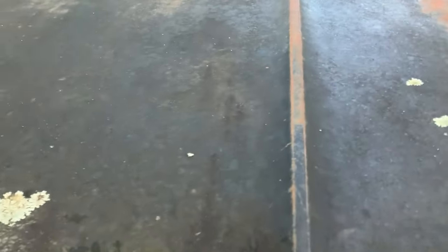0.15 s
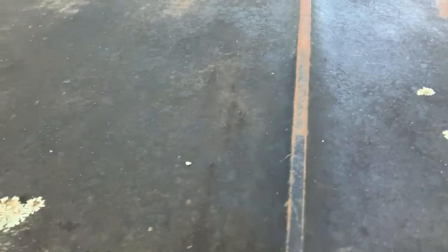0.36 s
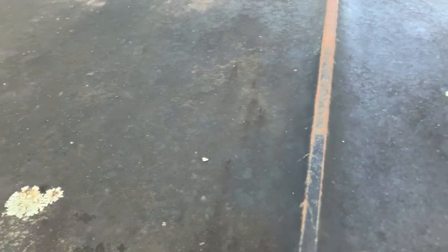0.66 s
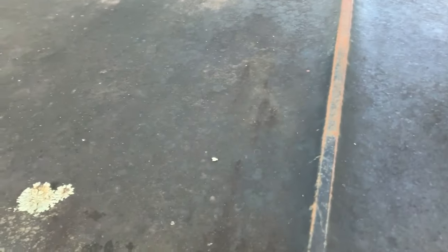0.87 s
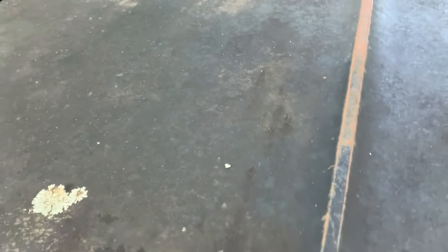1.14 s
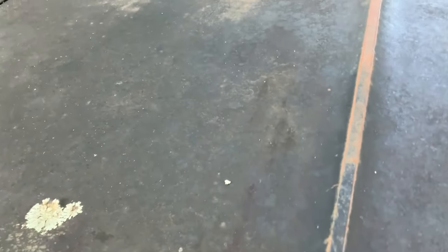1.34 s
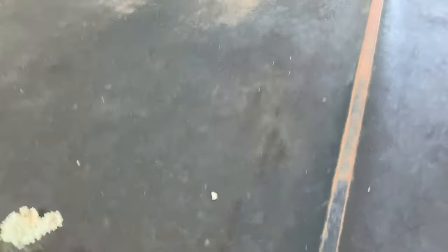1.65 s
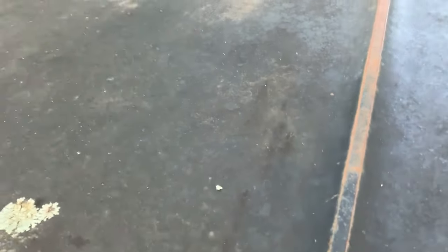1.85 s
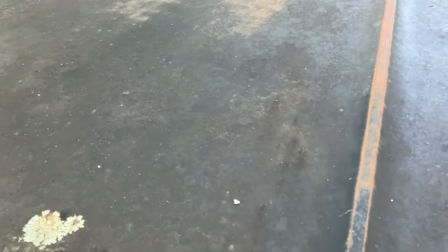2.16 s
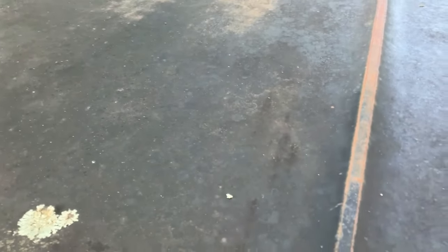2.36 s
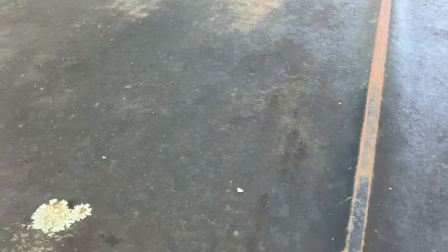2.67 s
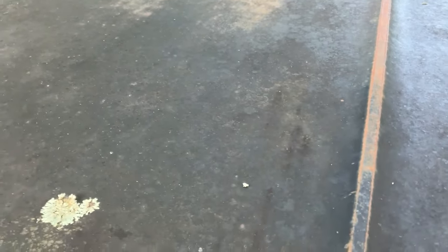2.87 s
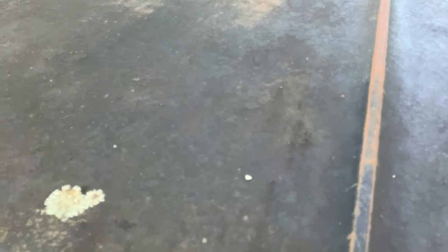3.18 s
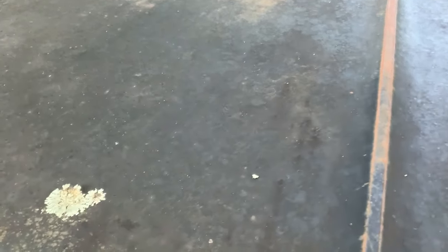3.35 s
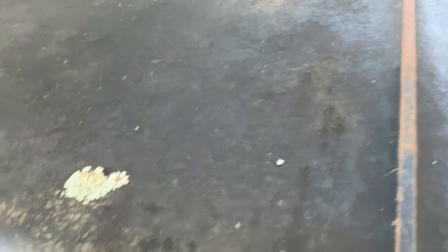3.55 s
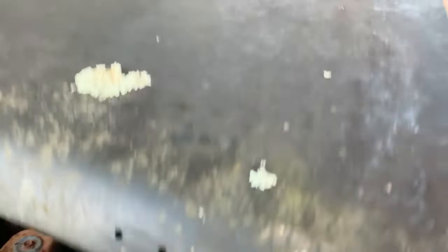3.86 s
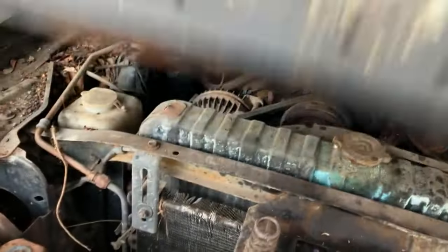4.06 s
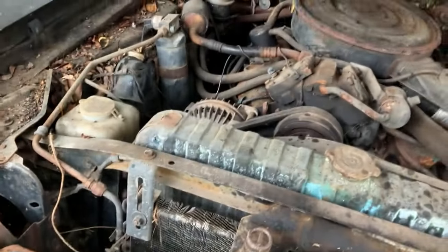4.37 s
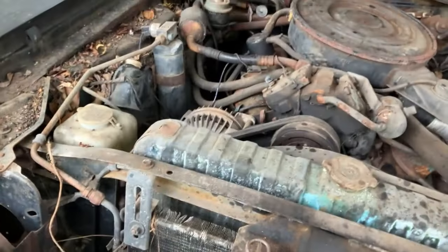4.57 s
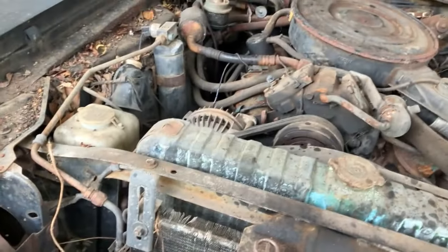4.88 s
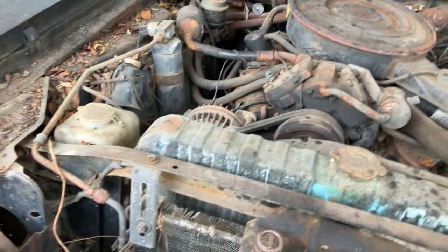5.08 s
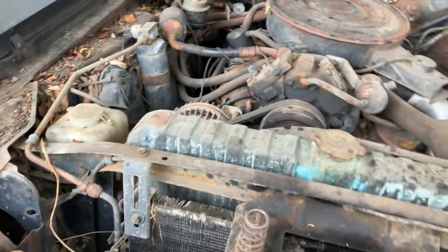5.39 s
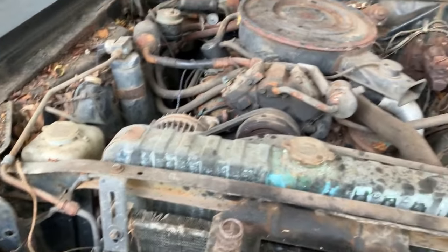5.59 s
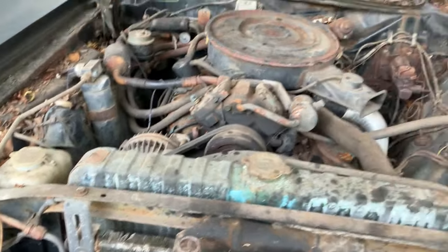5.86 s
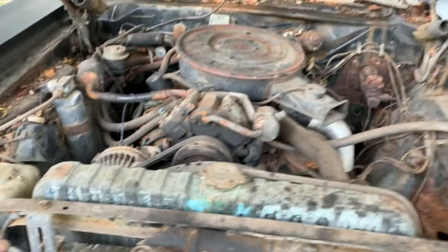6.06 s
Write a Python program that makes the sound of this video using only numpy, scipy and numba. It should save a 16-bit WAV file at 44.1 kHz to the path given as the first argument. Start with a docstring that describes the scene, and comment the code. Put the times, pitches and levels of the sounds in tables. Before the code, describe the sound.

Quiet outdoor air with very faint far traffic and thin insect hiss, heard close to a rusty steel hood. From 0 to 0.6 s hands scuff and push the sheet, giving soft low knocks and rumble; a high bird whistle glides down at 0.5 s. A firmer knock lands at 1.0 s, and a lower bird call follows at 1.3 s. At 1.5 s a booming clunk leads into the heavy, hollow unlatching blow at 1.64 s, with rough scraping until about 2.1 s. Small knocks, scuffs and a faint squeak continue from 2.4 to 3.3 s, then a near lull. From 3.6 s the hood swings up with growing rumble and scrape, a light click at 4.2 s, and a bright ringing spring clang at 4.75 s. Swaying and rubbing follow, a hard deep thud hits at 5.4 s, and dry leaves crackle from 5.8 s to the end.

```python
"""A rusty steel car hood outdoors, under still air, far traffic and insects (bands of filtered noise).
Hands scuff and push it (swelling noise), blows ring its dense modes, the hinge squeaks (narrow noise) and
far birds call (gliding whistles). Heavy clunks unlatch it near 1.6 s; from 3.6 s it swings up until its
hinge spring clangs near 4.75 s. A hard blow follows near 5.4 s, then dry leaves crackle (short ringing
bursts). A phone held just above the hood listens."""
import sys
import numpy as np
from scipy import signal
from scipy.fft import rfft, irfft, next_fast_len
from scipy.io import wavfile
from scipy.ndimage import uniform_filter1d
from numba import njit

SR = 44100
rng = np.random.default_rng(int(sys.argv[2]) if len(sys.argv) > 2 else 0)


def generate_wav(signal):
    """Clip the signal to [-1, 1] and save it as 16-bit WAV at the path in sys.argv[1]."""
    frames = np.transpose(np.atleast_2d(signal))
    scaled = np.clip(frames, -1, 1) * 32767
    pcm = np.round(scaled).astype(np.int16)
    wavfile.write(sys.argv[1], SR, pcm)


N = 274504  # length in samples


def undb(db):
    """Decibels to amplitude."""
    return 10 ** (np.asarray(db) / 20)


def along(table, hz):
    """Read a (freq_hz, value) table on a log-frequency axis."""
    table_hz, value = np.transpose(table)
    return np.interp(np.log(np.maximum(hz, 1)), np.log(table_hz), value)


def bell(hz, centre_hz, width_hz):
    """Gaussian band; width_hz is its standard deviation."""
    return np.exp(-.5 * ((hz - centre_hz) / width_hz) ** 2)


def noise(gain_of_hz, alike_hz=510.0):
    """Coloured stereo noise of rms 1; below alike_hz the two sides grow alike."""
    size = next_fast_len(N)
    hz = np.arange(size // 2 + 1) * SR / size
    mid, side = rng.standard_normal((2, len(hz), 2)) @ np.array([1, 1j])
    side = side * np.clip(hz / alike_hz, .1, 1)
    spectrum = np.array([mid + side, mid - side]) * gain_of_hz(hz)
    x = irfft(spectrum, size)[:, :N]
    return x / np.sqrt(np.mean(x ** 2))


@njit
def add_modes(out, start, left, right, pole, rise, head, head_fade):
    """Add decaying modes from one moment on; each builds up smoothly and its onset level can differ."""
    for m in range(len(pole)):
        ringing, yet_to_rise, extra = 1 + 0j, 1., head
        for i in range(start, out.shape[1]):
            # stop once the mode is inaudible
            if (i & 31) == 0 and abs(ringing * left[m]) < 1e-5:
                break
            wave = ringing * (1 - yet_to_rise) ** 2 * (1 + extra)
            out[0, i] += (wave * left[m]).imag
            out[1, i] += (wave * right[m]).imag
            ringing *= pole[m]
            yet_to_rise *= rise[m]
            extra *= head_fade


# Colour of still air and far traffic: freq_hz, density_db (per Hz, relative)
AIR_COLOUR = [(15, -46.5), (25, 20), (236, 6), (840, 1.5), (936, -1), (1700, -12.5), (2840, -14),
              (3250, -12.5), (4740, -9), (8590, -6), (9570, -23), (14800, -9), (16000, -26.5)]
AIR_DB = -66.5  # rms level
# Steady insect bands: centre_hz, width_hz, level_db
INSECT_BANDS = [(4684, 420, -70), (6300, 110, -75)]


def outdoors():
    """Still air and far traffic as broad noise, under narrow noise bands of insects."""
    air = undb(AIR_DB) * noise(lambda f: undb(along(AIR_COLOUR, f)), alike_hz=800.)
    insects = sum(undb(db) * noise(lambda f: bell(f, centre_hz, width_hz))
                  for centre_hz, width_hz, db in INSECT_BANDS)
    return air + insects


def grain(hold_s, spread_db):
    """Uneven grip: random levels held briefly, a few much louder; rms 1."""
    hold = max(int(hold_s * SR), 1)
    levels = undb(spread_db * rng.exponential(size=N // 20))
    gain = uniform_filter1d(np.repeat(levels, hold)[:N], hold)
    return gain / np.sqrt(np.mean(gain ** 2))


def lumps(hz, width_hz, spread_db):
    """Random resonances of the parts that rub, one level every width_hz."""
    levels_db = spread_db * rng.standard_normal(1000)
    return undb(np.interp(hz / width_hz, np.arange(1000), levels_db))


FADE_DB = 20  # lost over one length after the peak

# The hood swings up on its stiff hinges: time_s, rumble_db, scrape_db, rustle_db (before the rustle lift)
HOOD_SWING = [(3.6, -82.5, -87.5, -100), (3.8, -65.5, -70, -90), (3.97, -55, -66, -83),
              (4.08, -55.5, -57.5, -71.5), (4.28, -56.5, -55, -67.5), (4.47, -56, -53.5, -66),
              (4.64, -50, -53, -67.5), (4.73, -56, -59.5, -64), (4.85, -89.5, -89.5, -100)]


def swells(moves, swing_column, rise, rounding):
    """Gain along time: moves rise, peak and fade by one rule; the swing of the hood adds in power."""
    t, swing = np.arange(N) / SR, np.array(HOOD_SWING)
    swing_db = np.interp(t, swing[:, 0], swing[:, swing_column], left=-200, right=-200)
    power = undb(swing_db) ** 2
    for peak_s, length_s, db in moves:
        near = slice(max(int((peak_s - 3 * length_s) * SR), 0), int((peak_s + 4 * length_s) * SR))
        u = (t[near] - peak_s) / max(length_s, .01)
        distance = np.where(u < 0, -u / rise, u)
        power[near] += undb(db - FADE_DB * distance ** rounding) ** 2
    return np.sqrt(power)


# Cloth and rust scuff over the sheet: peak_s, length_s, scrape_db, rustle_db (before the rustle lift)
SCUFF_MOVES = [(0.021, 0.056, -56, -65), (0.114, 0.19, -56.5, -62.5), (0.302, .1, -57.5, -64.5),
               (0.456, 0.073, -61, -64.5), (0.523, 0.075, -55, -63.5), (0.903, 0.073, -70.5, -69.5),
               (0.972, .15, -64, -68), (1.094, 0.036, -70, -75), (1.214, 0.047, -70, -75),
               (1.323, 0.12, -63.5, -73.5), (1.567, 0.14, -54, -67), (1.69, .12, -37.5, -51),
               (1.804, .1, -44, -55), (1.964, 0.11, -40.5, -52), (2.107, 0.072, -55.5, -63.5),
               (2.178, 0.055, -60, -61), (2.405, 0.037, -55.5, -69), (2.452, .06, -53, -69.5),
               (2.62, 0.054, -53, -65), (2.684, 0.19, -50, -62), (2.988, 0.17, -58.5, -62.5),
               (3.196, 0.089, -59, -69), (3.268, 0.11, -57.5, -70), (3.41, 0.22, -68, -73),
               (3.568, 0.54, -71, -70.5), (3.719, 0.024, -54, -75), (3.778, .1, -62.5, -75),
               (4.862, 0.31, -44, -65.5), (5.005, 0.11, -53, -58.5), (5.12, .2, -61.5, -67),
               (5.248, 0.13, -51, -61.5), (5.402, 0.19, -51, -61), (5.48, 0.071, -58.5, -78),
               (5.64, 0.14, -65, -73), (5.83, 0.031, -60, -56.5), (5.953, 0.19, -56, -55),
               (6.125, 0.44, -65, -67.5)]
SCUFF_RISE, SCUFF_ROUND = 0.62, 1.27  # rise as share of the length; 1 = pointed top, 2 = round top
# Colour of the scrape: freq_hz, density_db (per Hz, relative)
SCRAPE_SPECTRUM = [(240, -39.5), (400, 0.5), (689, -5.5), (754, -5.5), (1170, -4), (1590, -11.5),
                   (1810, -9), (2090, -8.5), (6000, -21.5), (7800, -43), (13200, -120)]


def scrape():
    """Rough rubbing: noise through random resonances, with the grain of an uneven grip."""
    peak_s, length_s, scrape_db, _ = np.transpose(SCUFF_MOVES)
    scraping = swells(zip(peak_s, length_s, scrape_db), 2, SCUFF_RISE, SCUFF_ROUND)
    rubbing = noise(lambda f: undb(along(SCRAPE_SPECTRUM, f)) * lumps(f, 70., 3.0))
    return rubbing * grain(0.016, 1.2) * scraping


# Colour of the rustle: freq_hz, density_db (per Hz, relative)
RUSTLE_SPECTRUM = [(2500, 0), (4000, -1.5), (7000, 6.5), (11000, 9.5), (16000, 4)]
RUSTLE_LIFT_DB = 7.5  # added to every rustle level


def rustle():
    """Fine treble of the same scuffs: noise broken into very short uneven grains."""
    peak_s, length_s, _, rustle_db = np.transpose(SCUFF_MOVES)
    rustling = swells(zip(peak_s, length_s, rustle_db), 3, SCUFF_RISE, SCUFF_ROUND)
    # 40 dB less below 2500 Hz
    treble = noise(lambda f: undb(along(RUSTLE_SPECTRUM, f) - 40 * (f < 2500)))
    return undb(RUSTLE_LIFT_DB) * treble * grain(0.00049, 2.65) * rustling


# Strongest modes of the shut hood: freq_hz, over_dense_db, t60_s (before a blow's ring factor)
SHUT_HOOD_MODES = [(52, -13, 0.76), (70.4, 1, 0.58), (97.7, 13.5, 0.89), (193.4, 4, 1), (231, 5, 0.8),
                   (266, 11, 0.63), (299.1, -1.5, 0.67), (367.6, 0.5, 0.78), (462, 8.5, 0.88),
                   (520, 4, 0.83), (565, 5, 1), (682, -1.5, 0.71), (826, 0.5, 0.42), (974, 15, 0.33),
                   (1122, 5.5, 1), (1584, -2.5, .3), (1824, 11.5, 0.29), (2660, 13, 0.29), (2830, 4, 0.22),
                   (5100, 14.5, 0.054)]


def sheet_peaks(hz, width_hz, peak_db):
    """Whatever pushes the sheet is heard through its strongest modes."""
    return 1 + undb(peak_db) * sum(bell(hz, mode_hz, width_hz) for mode_hz, _, _ in SHUT_HOOD_MODES)


# Hands push the sheet, or it sways after a blow: peak_s, length_s, rumble_db
PUSH_MOVES = [(0.11, 0.2, -34.5), (0.2, 0.26, -38.5), (0.304, .25, -38), (0.45, 0.41, -41),
              (0.558, 0.14, -41.5), (1.03, 0.26, -40), (1.9, 0.67, -29.5), (2.47, 0.072, -40.5),
              (2.61, .5, -48), (2.824, 0.16, -51), (2.972, 0.14, -58.5), (3.27, 0.18, -39.5),
              (3.5, 0.34, -55), (4.9, 0.64, -31), (5.29, 0.55, -37.5), (5.44, 0.27, -24.5),
              (5.91, 0.46, -54)]
PUSH_RISE, PUSH_ROUND = 0.25, 0.79  # rise as share of the length; 1 = pointed top, 2 = round top
# Colour of the rumble: freq_hz, density_db (per Hz, relative)
RUMBLE_SPECTRUM = [(18, -57), (30, -4), (86, 1.5), (131, 4.5), (204, 0), (412, -5.5), (590, -53.5),
                   (846, -24.5), (1500, -77), (1950, -36.5), (3300, -120)]


def rumble():
    """Low noise of the pushed or swaying sheet, coloured by its modes and an uneven grip."""
    pushing = swells(PUSH_MOVES, 1, PUSH_RISE, PUSH_ROUND)
    sheet = noise(lambda f: undb(along(RUMBLE_SPECTRUM, f)) * sheet_peaks(f, 5.0, 0.67), alike_hz=1800.)
    return sheet * pushing * grain(.012, 1.6)


# Centres of the boom, body, knock, clank and crack bands: centre_hz
BLOW_BAND_HZ = (85, 280, 850, 2700, 9000)
# Ring of the sheet's dense modes: freq_hz, t60_s (before random spread and a blow's ring factor)
DENSE_T60 = [(40, 0.73), (110, 0.49), (280, 0.98), (740, 0.99), (1900, 0.48), (4000, 0.27), (8000, 0.23),
             (16000, .12)]
# The two microphone ports hear the wide sheet at different phases: freq_hz, spread_rad
PORT_SPREAD = [(100, .08), (250, .22), (500, .7), (1000, 1.6), (4000, 1.5), (12000, 1.6)]
SPLIT = 0.84  # dents split each strong mode in three that beat: Hz per root of the frequency
PING_HZ = 900  # strong modes above this are pings
HEAD_T60_S = 0.045  # the onset's level difference dies away in this time


def ring_sheet(blows, modes, knee_hz=692.2, count=900):
    """Every blow lands elsewhere, so it wakes the same modes with new strengths and phases."""
    # a sheet has evenly many modes per Hz in the treble; curvature crowds them in the bass
    top = np.log(400) + 16000 / knee_hz
    grid = np.geomspace(40, 16000, num=2000)
    mode_number = top * (np.arange(count) + 2 * rng.random(count)) / (count + 1)
    dense_hz = np.interp(mode_number, np.log(grid / 40) + grid / knee_hz, grid)
    strong_hz, strong_db, strong_t60 = np.tile(np.transpose(modes), 3)
    strong_hz = strong_hz + SPLIT * strong_hz ** .5 * (rng.random(len(strong_hz)) - .5)
    hz = np.r_[dense_hz, strong_hz]
    dense_t60 = along(DENSE_T60, dense_hz) * undb(9.0 * (rng.random(count) - .5))
    t60 = np.r_[dense_t60, strong_t60]
    # where modes crowd, each gets less
    crowd_db = 10 * np.log10(count / top * (1 + hz / knee_hz))
    own_db = np.r_[np.zeros(count), strong_db] - crowd_db
    pings = np.r_[np.zeros(count), strong_hz > PING_HZ]

    out = np.zeros((2, N))
    chances = rng.random((len(blows), 3, len(hz)))
    for blow, (strength, turn, side) in zip(blows, chances):
        start_s, body, boom, knock, clank, crack, ping_db, ring, rise_ms, head_db = blow
        bands = list(zip(BLOW_BAND_HZ, (boom, body, knock, clank, crack)))
        db = along(bands, hz) + own_db + ping_db * pings + 4 * (strength - .5)
        phase = 2 * np.pi * turn
        apart = along(PORT_SPREAD, hz) * (2 * side - 1)
        left = undb(db) * np.exp(1j * (phase + apart))
        right = undb(db) * np.exp(1j * (phase - apart))
        decay = np.log(1000) / (max(ring, .02) * t60 * SR)
        pole = np.exp(2j * np.pi * hz / SR - decay)
        # the bass of the whole sheet takes longer to swing up
        rise_s = max(rise_ms, .1) / 1000 * (hz / 500) ** -.4
        add_modes(out, int(start_s * SR), left, right, pole, np.exp(-1 / (rise_s * SR)),
                  undb(head_db) - 1, 1000 ** (-1 / (HEAD_T60_S * SR)))
    return out


# Blows on the hood: start_s, body_db, boom_db, knock_db, clank_db, crack_db, ping_db (on strong high modes),
# ring_factor (times t60), rise_ms (at 500 Hz), head_db (onset against the later ring)
HOOD_BLOWS = [(0.025, -77, -62, -45, -62, -68, -6, 0.26, 1.3, 10),
              (0.075, -45.5, -40, -62, -53, -48, -7, 0.67, 3.6, -6),
              (0.199, -45, -52, -76, -81, -75, -3, 0.51, 3.8, 1),
              (0.287, -42.5, -40.5, -72, -69, -61, -3, 0.61, 1.3, 8),
              (0.447, -39.5, -57, -65, -60, -56, -6, 0.27, 2.4, 1.5),
              (0.534, -39, -42, -57.5, -60, -50, -2, 0.35, 1.6, 7.5),
              (1.018, -29, -53, -31.5, -43, -55, -9.5, 0.25, 4.6, 5),
              (1.51, -32.5, -16.5, -35.5, -43.5, -31, 1.5, 0.44, 8.7, 16),
              (1.641, -13, -7, -23, -24, -30.5, -1.5, 0.59, 2.15, 8),
              (1.799, -39, -24.5, -34.5, -49, -67, -1, 0.63, 1.9, 13),
              (1.919, -35, -49, -49, -54, -51, 0, 1, 3.3, 5),
              (2.453, -36.5, -64, -58, -59, -57, -3, 0.4, 4.4, 3),
              (2.591, -38, -54, -88, -57, -50, 4, 1, 1.9, -9),
              (2.816, -49, -70, -61, -58, -66, -3, 0.48, 1.9, 8),
              (3.059, -33.5, -27, -40.5, -47, -67, 2.7, 0.46, 2.8, 12.5),
              (3.156, -51, -29.5, -72, -54, -68, -7, 0.47, 2, 1),
              (3.259, -43, -52, -71, -70, -70, -3, 0.5, 1.3, 10),
              (3.521, -75, -53.5, -61.5, -86, -59, -1, .7, 3.1, -2),
              (3.713, -67, -81.5, -68, -82, -56, 0, 0.41, 1.7, 16),
              (3.843, -54, -74, -62, -53.5, -67, -9, 0.15, 1.4, 12.5),
              (3.951, -59, -56, -61, -76, -64, -6, 0.48, 3.1, -3),
              (4.207, -56, -68, -58, -34, -37.5, -12, .2, 1.7, 6.5),
              (4.653, -48, -51, -61, -68, -70, -3, 0.53, 2, 6),
              (4.7, -57, -57, -51, -48, -69, -5, 0.98, 2.9, -15),
              (4.753, -17.5, -26.5, -19, -12, -14, 0.7, 0.6, 7.6, 8.5),
              (5.235, -55, -57, -49.5, -49, -47, -5, 0.28, 3, 10),
              (5.272, -33.5, -37, -50, -82.5, -54, 1, 0.48, 3.4, 9),
              (5.364, -50, -42, -44.5, -65, -46.5, -4.5, 0.36, 3.4, 4),
              (5.424, -8.5, -22.5, -29.5, -37, -50.5, 3.5, 0.28, 1.9, 6)]
# Strongest modes of the open hood: freq_hz, over_dense_db, t60_s (before a blow's ring factor)
OPEN_HOOD_MODES = [(44.8, 7, .9), (110, 6, 0.7), (153, 1.5, 1.6), (199.3, 8.5, 0.53), (258.5, 8, 0.33),
                   (296.8, 11.5, 0.75), (315, -8.5, 3.9), (349, 4.5, 1.5), (476, -3.5, 2.3),
                   (680.5, -7, 4.8), (708, -7.5, 2.4), (736, -5, 5), (781, -5, 3.8), (784, 0.5, 0.73),
                   (995, 18.5, 0.45), (1114, 17, 0.4), (1240, 12, 0.75), (1350, 0, 1.37), (1734, 3, 0.62),
                   (2000, 13.5, 0.28), (2357, 15.5, 0.36), (2506, 14.5, 0.46), (2740, 14.5, 0.29),
                   (3065, 2.5, 0.42), (3590, 15, .2), (4140, 11, 0.24), (6900, 10.5, 0.067)]
LIFT_S = 3.6  # the hood leaves its latch; later blows ring the open modes


def hood():
    """Blows ring the modes of the latched hood, then those of the freed one."""
    blows = np.array(HOOD_BLOWS)
    shut = blows[:, 0] < LIFT_S
    return ring_sheet(blows[shut], SHUT_HOOD_MODES) + ring_sheet(blows[~shut], OPEN_HOOD_MODES)


# Hinge squeaks: start_s, end_s, centre_hz, width_hz, level_db
HINGE_SQUEAKS = [(0.138, 0.165, 2246, 31, -54), (0.302, 0.375, 1860, 10, -63.5),
                 (0.89, 0.968, 1900, 14, -68), (2.825, 3.31, 1710, 140, -60), (4.44, 4.74, 2220, 140, -59),
                 (4.924, 5.143, 2220, 110, -59), (5.543, 5.884, 1770, 140, -66),
                 (5.898, 6.22, 1647, 34, -69.5)]


def hinge():
    """Faint squeaks while the hinge turns: narrow noise under a round swell."""
    t, out = np.arange(N) / SR, 0
    for start_s, end_s, centre_hz, width_hz, db in HINGE_SQUEAKS:
        arch = 4 * (t - start_s) * (end_s - t) / (end_s - start_s) ** 2
        swell = np.sqrt(np.clip(arch, 0, 1))
        out = out + undb(db) * swell * noise(lambda f: bell(f, centre_hz, width_hz))
    return out


# Bird calls: start_s, length_s, start_hz, middle_hz, end_hz, level_db (before echoes), echo_t60_s
BIRD_CALLS = [(0.512, 0.1, 8600, 8480, 6640, -50.5, 0.4), (1.07, 0.036, 7900, 6700, 6300, -70, .2),
              (1.271, .07, 3050, 2890, 2000, -59, 0.69)]


def birds():
    """Whistled glides, each smeared by echoes from the trees (decaying noise)."""
    out = np.zeros((2, N + SR))
    for start_s, length_s, *glide_hz, db, echo_t60_s in BIRD_CALLS:
        u = np.arange(int(length_s * SR)) / (length_s * SR)
        pitch_hz = np.polyval(np.polyfit([0, .5, 1], glide_hz, 2), u)
        call = np.sin(np.pi * u) * np.sin(2 * np.pi * np.cumsum(pitch_hz) / SR)
        echo_fade = 1000 ** (-np.arange(SR // 2) / (echo_t60_s * SR))
        echoes = 0.041 * rng.standard_normal((2, SR // 2)) * echo_fade
        echoes[:, 0] = 1  # the direct call
        wet = signal.fftconvolve(call[None], echoes)
        start = int(start_s * SR)
        out[:, start:start + wet.shape[1]] += undb(db) * wet
    return out[:, :N]


# Snaps of dry leaves: start_s, level_db (before the trim), centre_hz
LEAF_SNAPS = [(5.834, -46, 8660), (5.902, -44, 13500), (5.931, -32, 11400), (5.942, -22.5, 15200),
              (5.9624, -43, 13800), (5.9778, -34, 10600), (5.999, -28, 14200), (6.0192, -32.5, 9100),
              (6.0482, -27.5, 10760), (6.098, -30, 14700), (6.116, -32, 8060), (6.188, -40, 14500),
              (6.205, -31.5, 8900), (6.212, -26.5, 15500)]
LEAF_T60_S = 0.036
LEAF_TRIM_DB = -24.5  # each of the 90 partials sits this far from the snap's level


def leaves():
    """Each snap is a short burst of 90 decaying partials scattered around its own pitch."""
    out = np.zeros((2, N))
    chances = rng.random((len(LEAF_SNAPS), 3, 90))
    for (start_s, db, centre_hz), (detune, turn, side) in zip(LEAF_SNAPS, chances):
        hz = np.clip(centre_hz * 2 ** (1.8 * (detune - .5)), 500, 16000)
        left = undb(db + LEAF_TRIM_DB) * np.exp(2j * np.pi * turn)
        right = left * np.exp(6j * (side - .5))
        pole = np.exp(2j * np.pi * hz / SR - np.log(1000) / (LEAF_T60_S * SR))
        add_modes(out, int(start_s * SR), left, right, pole, np.full(len(hz), .9), 0., 0.)
    return out


def scene():
    """All layers, in the order they are first heard."""
    return outdoors() + scrape() + rustle() + rumble() + hood() + hinge() + birds() + leaves()


# Treble dips of the phone case: centre_hz, width_hz (two standard deviations), depth_db
CASE_DIPS = [(9796, 600, -20), (13000, 770, -38)]
BASS_CUT_HZ, TOP_HZ = 66, 16100


def record(dry):
    """The phone has two treble dips, loses the deepest bass, rounds the loudest peaks and cuts the top."""
    size = next_fast_len(N)
    hz = np.arange(size // 2 + 1) * SR / size
    dips = undb(sum(db * bell(hz, centre_hz, width_hz / 2) for centre_hz, width_hz, db in CASE_DIPS))
    dipped = irfft(rfft(dry, size) * dips, size)[:, :N]
    bass_cut = signal.butter(3, BASS_CUT_HZ, "high", fs=SR, output="sos")
    thinned = signal.sosfilt(bass_cut, dipped)
    rounded = np.tanh(.8 * thinned) / .8
    top_cut = signal.ellip(10, .2, 70, TOP_HZ, fs=SR, output="sos")
    return signal.sosfilt(top_cut, rounded)


dry = scene()
out = record(dry)
generate_wav(out)
```